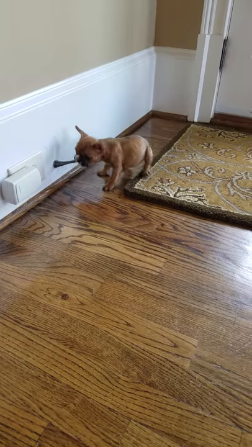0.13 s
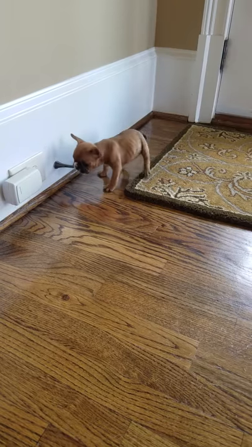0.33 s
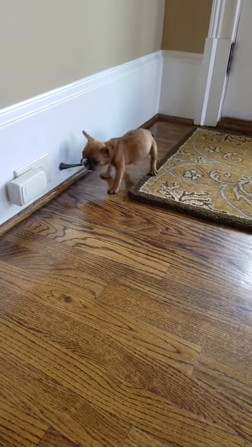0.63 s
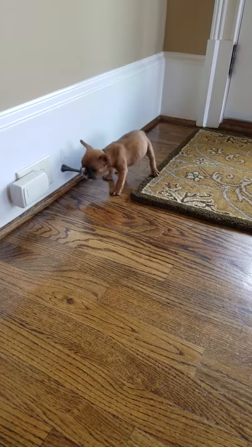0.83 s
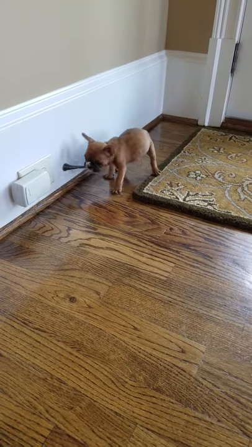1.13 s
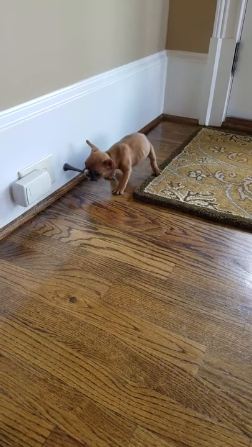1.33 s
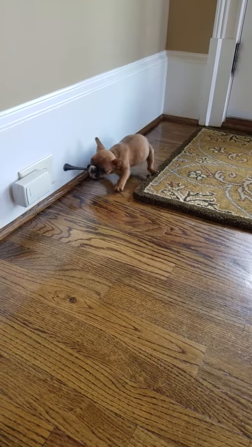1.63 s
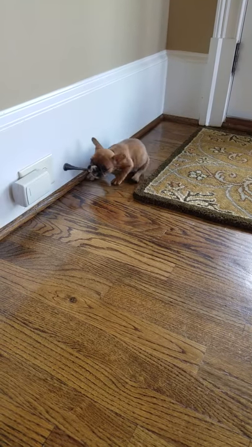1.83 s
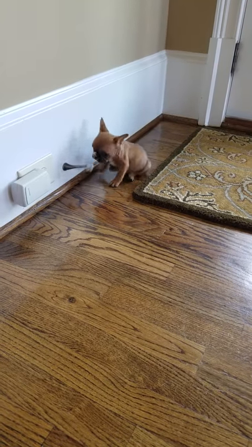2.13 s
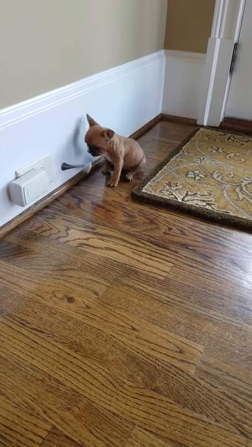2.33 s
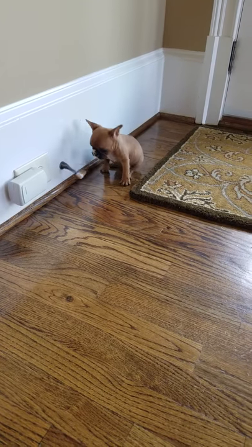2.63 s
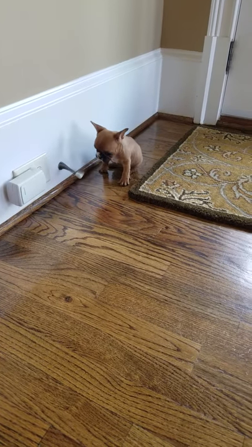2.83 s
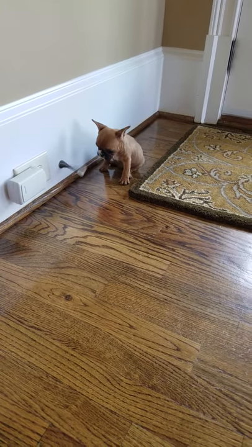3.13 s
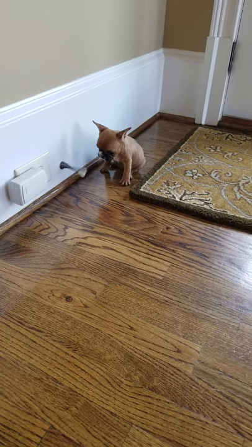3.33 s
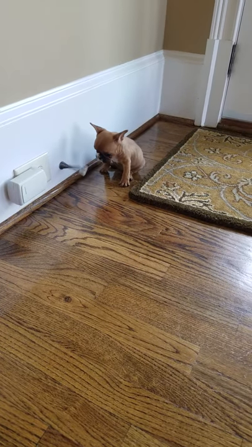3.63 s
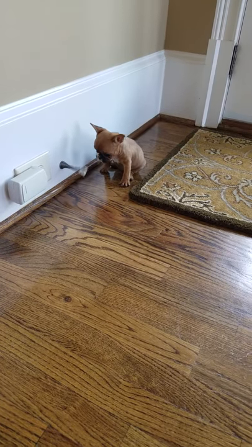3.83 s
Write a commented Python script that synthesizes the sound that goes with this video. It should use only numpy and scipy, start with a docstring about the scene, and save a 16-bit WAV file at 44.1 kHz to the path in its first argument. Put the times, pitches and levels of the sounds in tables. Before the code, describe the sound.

A spring door stopper rattles in a small, echoing hall, louder on the left. At first there is only a faint house hum, with light ticks, rubbing and paw taps from a puppy, and a soft bump near 1.8 seconds. At 2 seconds the spring snaps free, twanging loudly in rapid metallic pulses that knock the hollow baseboard, easing slightly but still going at 4 seconds.

```python
"""In a small hard-floored hall, a puppy noses a spring door stopper on a baseboard, bumps the wood,
bends the spring and lets it go. The spring whips to and fro, a little faster each swing; at each pass
its coils slap shut, knock the hollow baseboard and sizzle. The hall echoes, the house hums faintly,
and everything is louder on the left."""
import sys
import numpy as np
from scipy import signal
from scipy.fft import rfft, irfft
from scipy.io import wavfile
from scipy.ndimage import uniform_filter1d

SR = 44100
rng = np.random.default_rng(int(sys.argv[2]) if len(sys.argv) > 2 else 0)


def write(x):
    x = np.atleast_2d(x).T
    wavfile.write(sys.argv[1], SR, np.round(np.clip(x, -1, 1) * 32767).astype(np.int16))


N = 176400
TIME = np.arange(N) / SR
RELEASE_S = 1.9812  # the puppy lets go
# Table levels are relative. A "t60" is the time a sound takes to fade by 60 dB.

# How hard the spring slaps: t/s, knock/dB, boom/dB, outward clash/dB, return clash/dB
SWING_LEVELS = [(1.98, 2, 5, 6.5, -4), (2.05, 1.5, 5, 5.5, -3), (2.13, 6.5, 2, -2.5, -10),
                (2.25, 1.5, 1.5, -2.5, -7), (2.39, 1.5, 2, 4, -13), (2.58, 1.5, 0.5, 6.5, -7),
                (2.75, 0.5, -1.5, 3.5, -7), (3.03, 0, -2.5, 2, -7), (3.16, -2.5, 0, -6.5, -18),
                (3.29, -2.5, -1, 0.5, -5), (3.4, -2.5, -4, 1, -9), (3.6, -4.5, -4.5, -3, -18),
                (3.75, -5, -2.5, -12.5, -4.5), (3.9, -3, -2, -8.5, -4.5), (3.981, -4.5, -4.5, -6.5, -11)]
def spring():
    """Two slaps a swing ring the spring, shake the baseboard and clash the coils."""
    times, outward = slaps()
    knock_db, boom_db, out_db, back_db = strengths(SWING_LEVELS, times)
    # The return knock and boom start weaker, then the two directions even out.
    lopsided_db = -4.5 * ~outward * np.exp(-(times - RELEASE_S) / 0.17)
    out = sizzle()
    for side, chosen in ((1, outward), (-1, ~outward)):
        knocks = blows(times[chosen], (knock_db + lopsided_db)[chosen])
        booms = blows(times[chosen], (boom_db + lopsided_db)[chosen])
        out += knock(knocks) + steel_ring(knocks, side) + baseboard(booms) + rattle(knocks)
    return out + coils(blows(times + 0.00027, np.where(outward, out_db, back_db)))


# How far the swing drags behind its even speed-up: t/s, lag/s
SWING_LAG = [(1.98, 0), (2.2, .0009), (2.7, .0001), (3.05, .0001), (3.6, .0007), (4, .0005)]
def slaps():
    """When the ever faster swings slap, and which slaps are outward."""
    swings = np.arange(65) / 2
    first_swing_s = 0.06962
    times = RELEASE_S + first_swing_s * swings - 0.000213 * swings ** 2 - 5.7e-7 * swings ** 3
    return times + np.interp(times, *np.transpose(SWING_LAG)), swings % 1 == 0


# Tone of a knock, and of its echo in the hall: f/Hz, level/dB
KNOCK_TONE = [(60, -36), (200, -14), (400, -6), (800, -5), (1300, 2), (1650, -1), (2200, -8), (3200, -18),
              (4500, -33), (9000, -48)]
KNOCK_ECHO = [(70, -55), (220, 2.5), (300, -2.5), (550, 1), (720, -8), (830, 0.5), (920, -4), (1030, 0),
              (1300, -1.5), (1550, -1), (2200, 2), (3100, -5.5), (4500, -19), (8000, -26.5)]
def knock(hits):
    """The spring knocks on the baseboard and the hall answers."""
    return amp(2) * near(toned(-hits, KNOCK_TONE)) + amp(-1.5) * hall(hits, KNOCK_ECHO)


# Notes of the steel spring when straight: f/Hz, level/dB, t60/s
STEEL_NOTES = [(808.5, 4, 0.02), (832.6, -1, 0.082), (977, -9, 0.063), (1022, 1.5, 0.041), (1150, 2, 0.026),
               (1291, 2.5, 0.032), (1612, -3.5, 0.027), (2006, -12, 0.19), (2075, -6.5, 0.024),
               (2421, -9.5, 0.045), (2888, -21, 0.077), (3156, -20.5, 0.1), (3860, -8, 0.024),
               (5600, -16.5, 0.051)]
def steel_ring(hits, side):
    """The steel rings a little higher on one side of the swing (+1), lower on the other (-1)."""
    bent_notes = np.array(STEEL_NOTES) * [1 + side * 0.0073, 1, 1]
    ring = amp(-2.5) * ringing(hits, bent_notes, scatter_db=2.5, attack_s=0.00038)
    return ring + hall(ring, [(20, 0), (20000, 0)])


# Notes of the hollow baseboard: f/Hz, level/dB, t60/s
BOARD_NOTES = [(126.6, -2.5, 0.15), (154.4, 1.5, 0.23), (183, -1, 0.15), (241, -9, 0.13),
               (281.4, -0.5, 0.17), (305.4, 3, 0.23), (372.7, 2, 0.13), (458.5, 0.5, 0.06),
               (483, -4.5, 0.097), (541, 7, 0.046), (592, -4.5, 0.091), (654, -12.5, 0.11),
               (682, -11, 0.12)]
# Tone of its boom in the hall: f/Hz, level/dB
BOOM_ECHO = [(40, -36), (95, -43), (105, -23), (128, -4.5), (155, 0.5), (215, -15), (305, -1), (400, -11.5),
             (510, -4.5), (720, -12.5), (1100, -13), (3000, -74.5)]
def baseboard(hits):
    """The hollow wood booms at each slap."""
    return ringing(hits, BOARD_NOTES, scatter_db=2, attack_s=0.0027) + amp(-2) * hall(hits, BOOM_ECHO)


# Bright tone of coils meeting: f/Hz, level/dB
CLASH_TONE = [(1000, -23.5), (3000, -7), (4800, -20), (5700, -12.5), (6600, -13.5), (8050, -3.5),
              (9200, -13.5), (11500, -7.5), (13100, 1.5), (14300, -1), (15800, -7.5)]
def coils(hits):
    """Steel on steel: a sharp snap, then the turns chatter against each other."""
    snap = 0.35 * hits + 0.83 * bursts(hits, t60=0.004)
    chatter = amp(-2.5) * bursts(hits, t60=0.01)
    return amp(-2) * near(toned(snap + chatter, CLASH_TONE)) + amp(-4.5) * hall(snap, CLASH_TONE)


def sizzle():
    """The coils sizzle once as they spring free."""
    return toned(bursts(blows([RELEASE_S], db=[2.5]), t60=0.38), CLASH_TONE)


# The first, widest swings: t/s, thump/dB, crash/dB
SLAM_HITS = [(1.9806, 0.5, 4), (2.0514, 4.5, -4), (2.1201, 6.5, 6.5), (2.1895, 8, 7), (2.2573, 6, -4),
             (2.3248, 4, -6)]
# Tone of the wood's thump, and of the coils' crash: f/Hz, level/dB
THUMP_TONE = [(80, -45.5), (220, -7.5), (300, 2), (350, -7.5), (450, 0.5), (600, -0.5), (750, -10),
              (1500, -24.5), (4000, -64)]
CRASH_TONE = [(150, -27), (400, -5), (720, -7.5), (830, 7), (920, 1), (1050, -5.5), (1300, 5), (1750, 0),
              (2300, 1.5), (3100, -6), (4000, -21), (5000, -17), (9000, -21.5)]
def slams():
    """The widest swings thump the baseboard and crash the coils together."""
    times, thump_db, crash_db = np.transpose(SLAM_HITS)
    thump, crash = blows(times, thump_db), blows(times, crash_db)
    out = near(toned(-thump, THUMP_TONE) + amp(-9) * toned(-crash, KNOCK_TONE))
    out += toned(bursts(crash, t60=0.19), CRASH_TONE)
    return out + amp(1) * hall(thump, THUMP_TONE) + amp(1.5) * hall(crash, CRASH_TONE)


def rattle(hits):
    """The turns jostle after each slap."""
    return amp(-9.5) * toned(bursts(hits, t60=0.035), CRASH_TONE)


# How hard the foot of the spring clacks: t/s, outward/dB, return/dB
CLACK_LEVELS = [(1.98, -9.5, -15), (2.6, -13, -14.5), (3.1, -10, -15), (3.55, -14.5, -14.5),
                (3.72, -16.5, -11.5), (3.95, -13.5, -11)]
# Tone of a clack: f/Hz, level/dB
CLACK_TONE = [(1000, -19), (2500, -13), (3050, 10), (3400, 2), (3850, -6), (4400, -3.5), (5200, -5),
              (5650, -2), (6200, -3), (7500, 1.5), (10000, -20)]
def clacks():
    """The tight turns at the foot give each slap a crisp edge."""
    times, outward = slaps()
    out_db, back_db = strengths(CLACK_LEVELS, times)
    hits = blows(times + 0.0005, np.where(outward, out_db, back_db))
    scrape = 0.54 * hits + 0.77 * bursts(hits, t60=0.01)
    return near(toned(scrape, CLACK_TONE)) + hall(hits, CLACK_TONE)


# Paws and body bumping wood, light floor taps, dull paw pats: t/s, level/dB
BUMP_HITS = [(0.123, -23.5), (0.149, -17.5), (1.743, -12.5), (1.771, -3.5), (1.803, -28), (1.959, -16)]
TAP_HITS = [(.543, -23), (1.571, -32), (1.826, -22.5)]
PAT_HITS = [(.318, -25), (.365, -31), (.62, -27)]
# Notes of the bumped floorboards, and of a pat: f/Hz, level/dB, t60/s
FLOORBOARD_NOTES = [(141, 5, 0.023), (182, 10, 0.036), (234, -9, 0.059), (320, -19, 0.022)]
PAT_NOTES = [(558, 5, 0.033), (640, -15, 0.026)]
# Tone of a bump's echo, and of a tap: f/Hz, level/dB
BUMP_ECHO = [(40, -26), (110, -10), (175, -4), (230, -0.5), (330, -14), (600, -32), (3000, -54)]
TAP_TONE = [(100, 2), (300, 7), (1200, 0), (2500, -5), (6000, -38), (15000, -30)]
def paws():
    """The puppy bumps, taps and pats the wood, which rings briefly."""
    bumps, taps, pats = (blows(*np.transpose(table)) for table in (BUMP_HITS, TAP_HITS, PAT_HITS))
    out = amp(-2.5) * hall(bumps, BUMP_ECHO)
    out += ringing(bumps, FLOORBOARD_NOTES, scatter_db=1, attack_s=0.0037)
    out += toned(bursts(taps, t60=0.0049), TAP_TONE) + amp(-0.5) * hall(taps, TAP_TONE)
    return out + ringing(pats, PAT_NOTES, scatter_db=1.5, attack_s=0.0026)


# Coil ticks, and how loudly the muzzle rubs: t/s, level/dB
TICK_HITS = [(0.0441, -29), (0.304, -36), (.6559, -29), (0.692, -29), (1.071, -43), (1.113, -34)]
RUB_LEVELS = [(.03, -60), (.06, -51.5), (.1, -58), (.14, -49.5), (.18, -61), (.68, -60), (.8, -58.5),
              (1.44, -61), (1.5, -49), (1.6, -56), (1.7, -50.5), (1.76, -51), (1.82, -47.5), (1.93, -55.5),
              (2, -52), (2.1, -78)]
# Tone of the rubbing: f/Hz, level/dB
RUB_TONE = [(200, 1), (1000, -3), (2500, -5), (5000, -12), (7800, -10), (9300, -13.5), (13500, -3),
            (15800, 0.5)]
def muzzle():
    """The puppy's muzzle rubs on the spring, and the coils tick."""
    loudness = amp(np.interp(TIME, *np.transpose(RUB_LEVELS)))
    return coils(blows(*np.transpose(TICK_HITS))) + loudness * toned(noise(N), RUB_TONE)


# Echoes off nearby surfaces: left delay/s, right delay/s, gain
FIRST_ECHOES = [(.0029, .0023, 0.43), (.0039, 0.0041, 0.27), (0.014, .0121, .22)]
def near(x):
    """The direct sound, shaded on the right, and its first echoes from floor and walls."""
    paths = np.zeros((2, SR // 10))
    paths[:, 0] = 1, amp(-20)
    for left, right, gain in FIRST_ECHOES:
        paths[[0, 1], [int(left * SR), int(right * SR)]] += gain
    return through(x, paths)


# How long the hall rings: f/Hz, t60/s
HALL_FADE = [(120, 0.69), (500, 0.39), (2000, 0.4), (7000, 0.51), (15000, 0.34)]
def hall(x, tone):
    """The hall's wash of echoes of x, in the given tone; the bass lasts longest."""
    hz, t, bands = signal.stft(noise(SR // 2), SR, nperseg=256)
    fade = amp(-60 * t / along(HALL_FADE, hz)[:, None])
    rise = 1 - np.exp(-t / 0.00062)
    spectrum = rfft(signal.istft(bands * fade * rise, SR, nperseg=256)[1])
    # Even out the tail's spectrum before giving it its tone.
    local_level = np.sqrt(uniform_filter1d(np.abs(spectrum) ** 2, size=40, axis=1))
    tail = irfft(spectrum / local_level)[:, :SR * 2 // 5]
    return through(x, normed(through(tail, tone_filter(tone))))


# Tone of the house's steady noise: f/Hz, level/dB
HOUSE_TONE = [(15, -59), (25, -31), (64, -4), (96, -19), (126, -1), (194, -7.5), (248, -3.5), (284, -9),
              (527, -11), (604, -13), (812, -13.5), (5980, -35.5), (15800, -54)]
def house(hum_hz=265.5):
    """A low rush and a faint steady hum, both quieter on the right."""
    rush = amp(-56.5) * toned(noise(N), HOUSE_TONE)
    hum = amp(-62.5) * np.sin(2 * np.pi * hum_hz * TIME)
    return (rush + hum) * amp([[0], [-7]])


# How alike left and right are: f/Hz, likeness (1 = the same)
LIKENESS = [(100, 0.79), (300, 0.58), (700, 0.1), (2000, 0.081), (12000, 0.067)]
def noise(size):
    """Stereo noise, nearly the same on both sides in the bass."""
    angle = np.arccos(along(LIKENESS, np.fft.rfftfreq(size, 1 / SR))) / 2
    white = rfft(rng.standard_normal((2, size)))
    mid, side = irfft(white * [np.cos(angle), np.sin(angle)], size)
    return np.array([mid + side, mid - side])


def ringing(hits, notes, scatter_db, attack_s):
    """Every hit rings the same fading notes, each time in a slightly different mix."""
    t = TIME[:SR // 3]
    waves = np.array([amp(db - 60 * t / t60) * np.sin(2 * np.pi * hz * t + rng.uniform(0, 2 * np.pi))
                      for hz, db, t60 in notes])
    waves *= 1 - np.exp(-(t / attack_s) ** 2)
    bass_cut = signal.butter(2, 0.72 * notes[0][0], "high", fs=SR, output="sos")
    waves = signal.sosfilt(bass_cut, waves)
    waves /= np.linalg.norm(waves)
    out = np.zeros(N + len(t))
    for i in np.flatnonzero(hits):
        out[i:i + len(t)] += hits[i] * amp(rng.normal(0, scatter_db, len(notes))) @ waves
    return out[None, :N]


def bursts(hits, t60):
    """A fresh puff of fading noise for each hit."""
    fade = normed(amp(-60 * TIME[:SR // 2] / t60))
    power = through(hits ** 2, fade ** 2)
    return np.sqrt(np.abs(power)) * noise(N)


def strengths(table, times):
    """Each level column at the given times, slightly uneven."""
    t, *columns = np.transpose(table)
    return [np.interp(times, t, db) + rng.normal(0, 0.5, len(times)) for db in columns]


def blows(times, db):
    """One single-sample click for each hit."""
    return np.bincount(np.round(np.asarray(times) * SR).astype(int), amp(db), N)[:N]


def toned(x, tone):
    """Give x a tone: a list of (f/Hz, level/dB) points."""
    return through(x, normed(tone_filter(tone)))


def tone_filter(tone):
    """The promptest click that has this tone (a minimum-phase filter)."""
    hz = np.fft.rfftfreq(16384, 1 / SR)
    cepstrum = irfft(np.log(amp(along(tone, hz))))
    cepstrum[1:] *= 2
    cepstrum[len(cepstrum) // 2:] = 0
    return irfft(np.exp(rfft(cepstrum)))[:SR // 10]


def through(x, response):
    """Pass x through a filter or echo pattern, channel by channel."""
    return signal.fftconvolve(np.atleast_2d(x), np.atleast_2d(response), axes=1)[:, :N]


def along(points, hz):
    """Read between (f/Hz, value) points on a log frequency scale."""
    f, values = np.transpose(points)
    return np.interp(np.log(hz + 1), np.log(f + 1), values)


def normed(x):
    """Scale each channel to an energy of 1."""
    return x / np.linalg.norm(x, axis=-1, keepdims=True)


def amp(db):
    """Decibels to gain."""
    return 10 ** (np.asarray(db) / 20)


# How much the right side is turned down: f/Hz, level/dB
RIGHT_TONE = [(30, -5), (130, -10), (500, -8.5), (2000, -6), (4200, -7), (8000, -2.5), (13000, -7.5)]
def scene():
    """Spring and puppy, louder on the left, over the steady noise of the house."""
    left, right = spring() + slams() + clacks() + paws() + muzzle()
    right = through(right, tone_filter(RIGHT_TONE))[0]
    return np.array([left, right]) + house()


def record(dry, top_hz=15750):
    """Cut away the very highest treble."""
    return signal.sosfilt(signal.ellip(10, .1, 80, top_hz, fs=SR, output="sos"), dry)


dry = scene()
out = record(dry)
write(out)
```